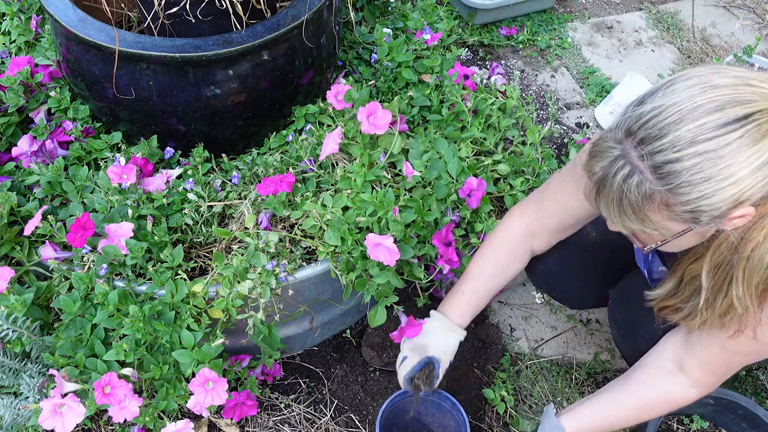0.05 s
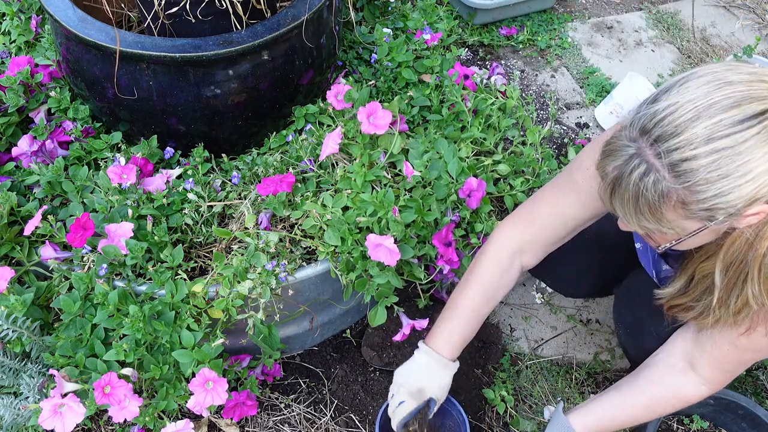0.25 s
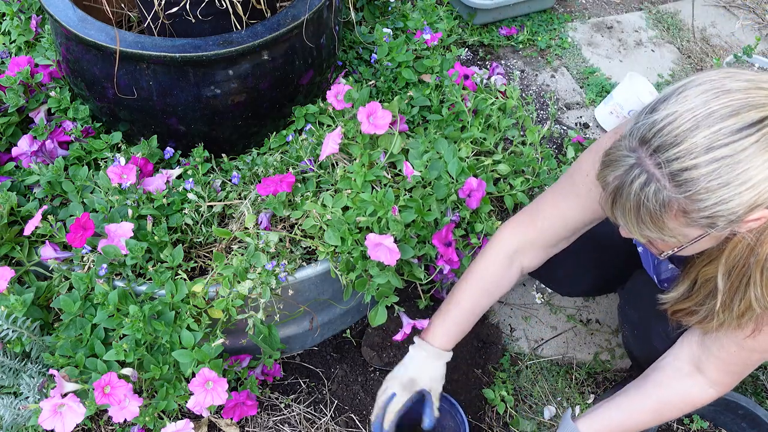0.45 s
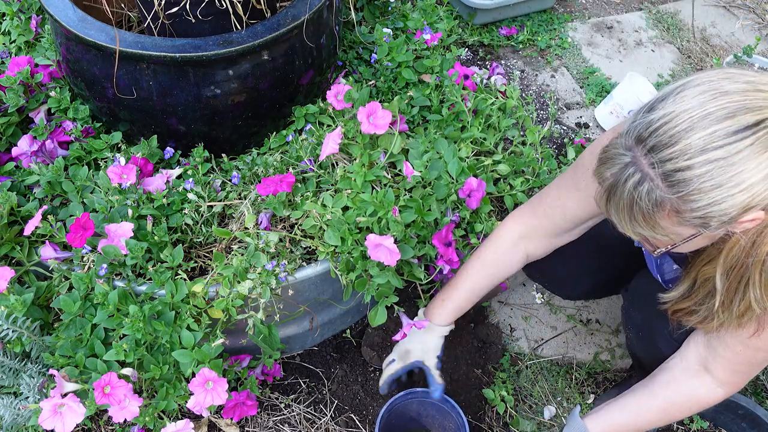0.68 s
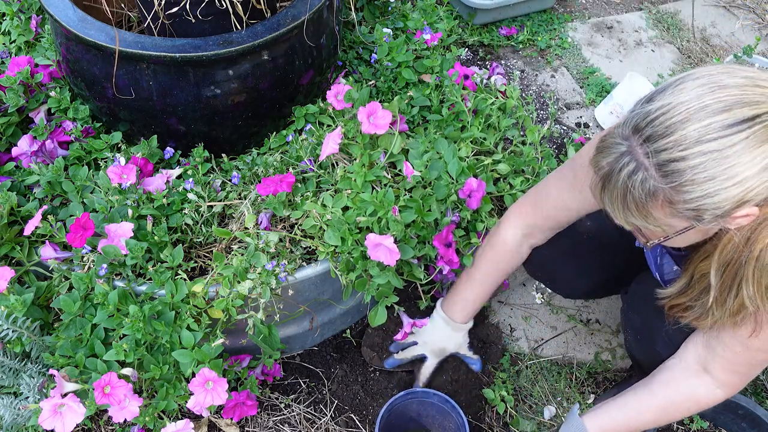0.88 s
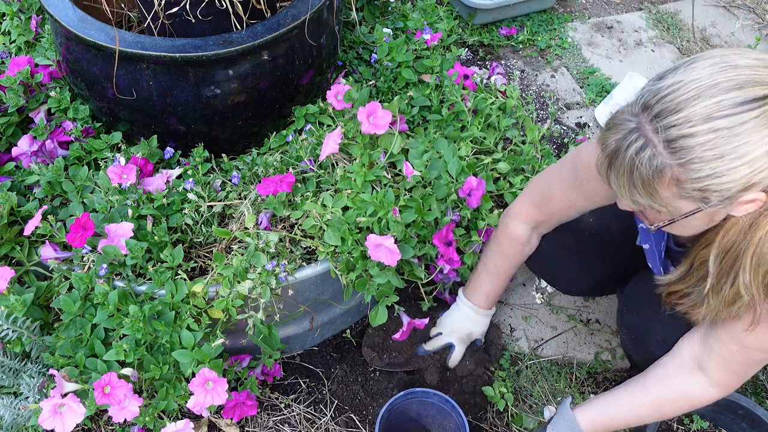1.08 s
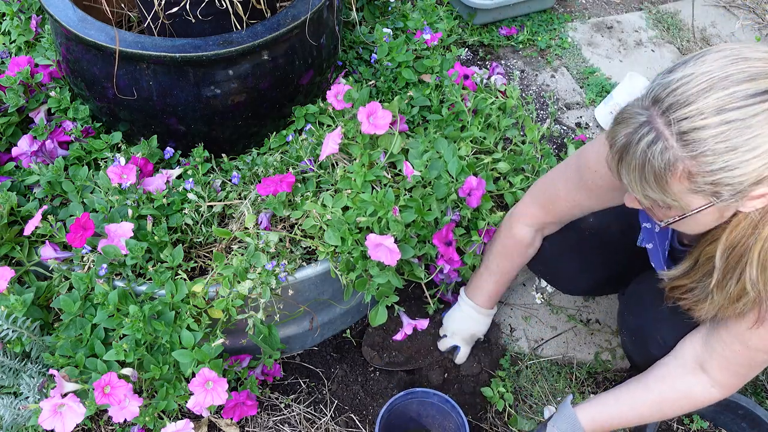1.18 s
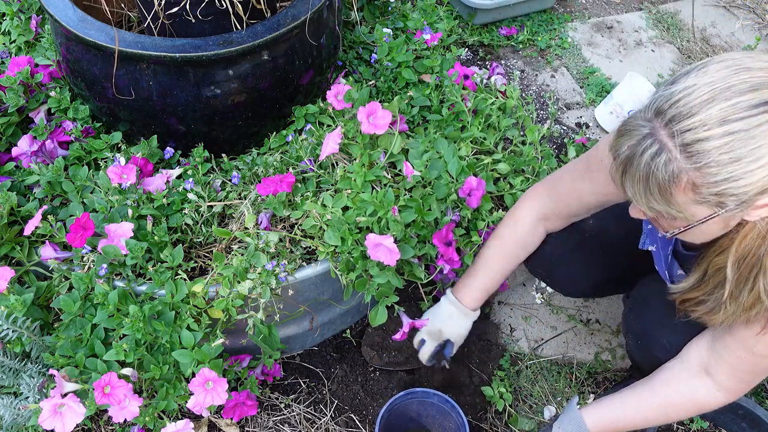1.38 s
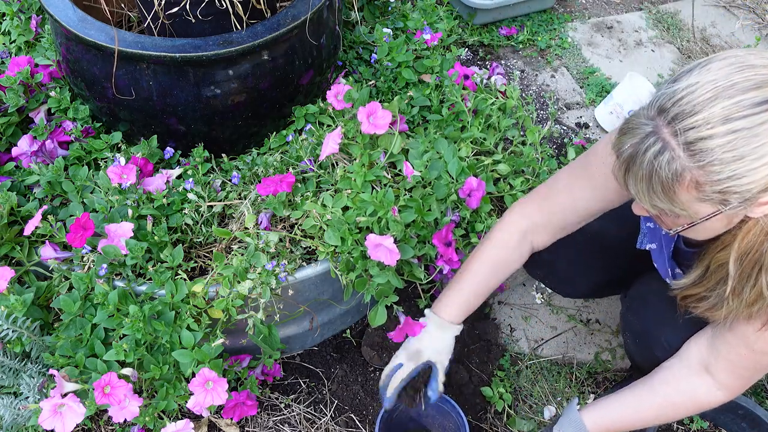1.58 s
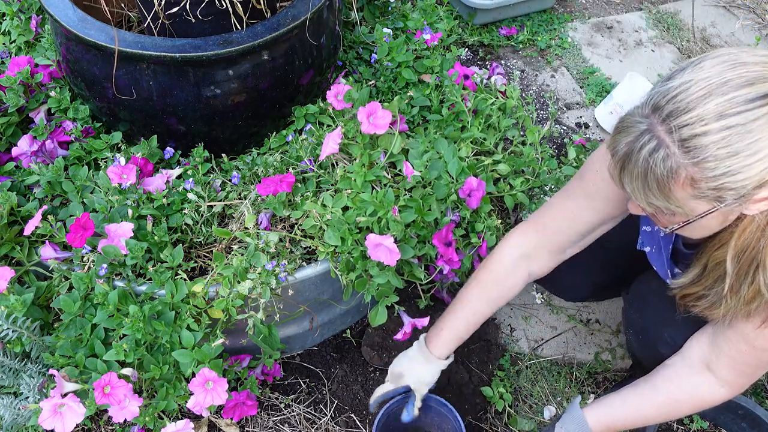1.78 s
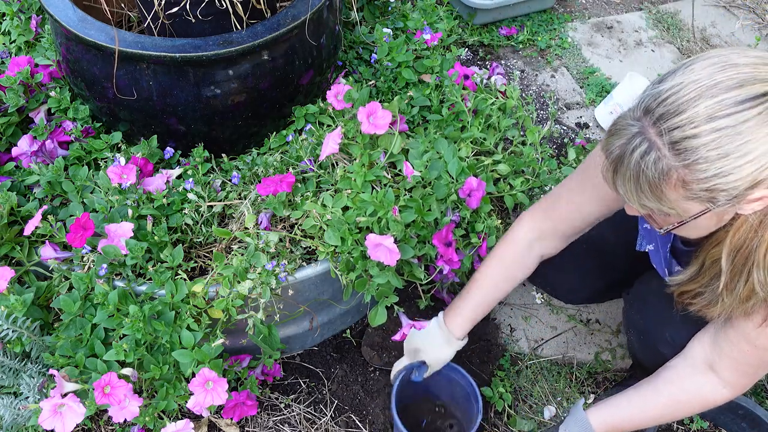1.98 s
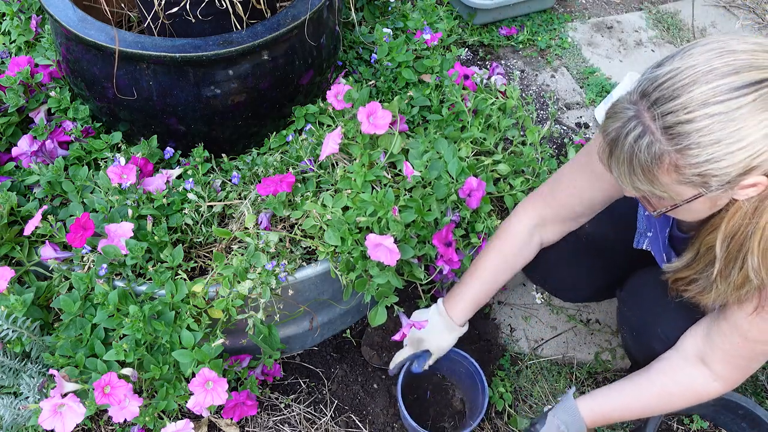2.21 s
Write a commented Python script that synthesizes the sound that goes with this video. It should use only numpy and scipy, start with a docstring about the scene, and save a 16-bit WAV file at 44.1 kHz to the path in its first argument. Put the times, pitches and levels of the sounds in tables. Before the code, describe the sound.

Loose soil dropping into a small plastic pot, with a gloved hand sweeping the ground.

```python
"""In a quiet garden, a gloved hand drops a handful of loose soil into a small plastic pot.
Clods tap the thin wall and ring it, crumbs patter after them and the soft bulk lands on the soil inside.
Then the hand pats and presses the ground and sweeps soil together, grit ticking on the glove.
From about 1.6 s a second, lighter handful falls, and a few soft lumps skid along the wall."""
import sys
import numpy as np
from scipy import signal
from scipy.fft import rfft, irfft, next_fast_len
from scipy.io import wavfile
from scipy.ndimage import uniform_filter1d

SR = 44100
rng = np.random.default_rng(int(sys.argv[2]) if len(sys.argv) > 2 else 0)


def wav_record(signal):
    """Record a signal, one row per channel, as 16-bit PCM in the file named by sys.argv[1]."""
    frames = np.transpose(np.atleast_2d(signal))
    bounded = np.clip(frames, -1, 1)
    # unit amplitude maps onto the largest positive 16-bit level
    quanta = np.round(bounded * 32767).astype(np.int16)
    wavfile.write(sys.argv[1], SR, quanta)


N = 99225
TIME = np.arange(N) / SR


def from_db(db):
    """Decibels to gain."""
    return 10 ** (np.asarray(db) / 20)


def unit_rms(x):
    """Scale to unit rms."""
    return x / np.sqrt(np.mean(x ** 2) + 1e-20)


def automation(rows):
    """Straight ramps between breakpoints, holding the first and last value."""
    return np.interp(TIME, *np.transpose(rows))


def place(track, start, sound):
    """Mix a sound in at a time in seconds."""
    i = int(start * SR)
    track[i:i + len(sound)] += sound[:N - i]


def butter(x, order, hz, kind="low"):
    """Butterworth filter."""
    return signal.sosfilt(signal.butter(order, hz, kind, fs=SR, output="sos"), x)


def equalise(x, curve):
    """Minimum-phase EQ, so nothing rings ahead of a click; unit rms."""
    size = 2 * next_fast_len(N)
    hz, db = np.transpose(curve)
    bin_db = np.interp(np.log(np.fft.rfftfreq(size, 1 / SR) + 1), np.log(hz), db)
    cepstrum = irfft(np.log(from_db(bin_db)))
    cepstrum[1:size // 2] *= 2
    cepstrum[size // 2 + 1:] = 0
    return unit_rms(irfft(rfft(x, size) * np.exp(rfft(cepstrum)))[:N])


def ring(x, hz, t60):
    """A resonance that keeps the energy of a click."""
    radius, angle = from_db(-60 / (t60 * SR)), 2 * np.pi * hz / SR
    gain = np.sqrt((1 - radius ** 2) / 2)
    return signal.lfilter([gain, 0, -gain], [1, -2 * radius * np.cos(angle), radius ** 2], x + 1e-18)


def blip(hz, rise_s):
    """A few cycles that swell and die at once."""
    t = TIME[:SR // 16]
    return t / rise_s * np.exp(1 - t / rise_s) * np.sin(2 * np.pi * hz * t)


def crunch(decay_s):
    """The noise burst of a grain breaking up."""
    t = TIME[:SR // 32]
    return rng.standard_normal(len(t)) * np.exp(-t / decay_s)


def grains(per_s, spread_db):
    """Random clicks of uneven size, with even mean power at any rate."""
    hits = rng.random(N) < per_s / SR
    sizes = from_db(spread_db * np.minimum(rng.exponential(1, N), 3)) * rng.choice([-1, 1], N)
    return unit_rms(hits * sizes / np.sqrt(per_s))


def steady(x, over_s):
    """Even out the power over a short span, leaving the fine grain."""
    power = np.abs(uniform_filter1d(x * x, int(over_s * SR) + 1))
    return x / np.sqrt(power + .02 * np.mean(x * x))


# EQ of the garden ambience: f/Hz, level/dB
AIR_EQ = [(20, -13), (45, -1.5), (110, 1), (550, -6.5), (1000, -9), (2500, -25), (8000, -24.5),
          (16000, -43)]

def garden_air():
    """A faint, dark bed of outdoor noise."""
    return from_db(-54.5) * equalise(rng.standard_normal(N), AIR_EQ)


LIGHT_TOUCH_HZ, GRIT_DECAY_S = [5670, 10800], 0.00094

def specks():
    """Specks shift on the glove throughout, each a tiny bright tick."""
    clicks = steady(grains(per_s=110, spread_db=3.5), over_s=0.1)
    power = signal.fftconvolve(clicks ** 2, np.exp(-TIME[:SR // 100] / GRIT_DECAY_S))[:N]
    ticks = np.sqrt(np.abs(power)) * rng.standard_normal(N)
    return from_db(-60) * unit_rms(butter(ticks, 2, LIGHT_TOUCH_HZ, "band"))


# resonances of the plastic pot: f/Hz, level/dB, t60/s
POT_MODES = [(420, -14.5, 0.013), (682, -5.5, 0.019), (1350, -5, 0.005), (1620, -1.5, 0.015),
             (1900, -7.5, 0.029), (2480, 2.5, 0.004), (2624, 2, 0.022), (2990, 1, 0.01), (3470, 0, 0.0041),
             (4310, -4, 0.006)]
# weight of the landing soil, as drive to the low resonances: t/s, level/dB
LANDING_WEIGHT = [(.1, -1.5), (.55, 1), (1.79, -5.5), (1.9, 0)]

def pot(clicks, uneven, low_modes_hz=2200):
    """Each click rings every resonance with a strength of its own; heavy landings favour the low ones."""
    gains = from_db([db for _, db, _ in POT_MODES])
    gains /= np.linalg.norm(gains)
    weight = from_db(automation(LANDING_WEIGHT))
    out = np.zeros(N)
    for k, (hz, _, t60) in enumerate(POT_MODES):
        drive = clicks * weight if hz < low_modes_hz else clicks
        strength = 1 + uneven * rng.standard_normal(N)
        out += (-1) ** k * gains[k] * ring(drive * strength, hz, t60)
    return out


def cavity(x, notch_hz=876, depth=0.75):
    """The hollow of the pot cuts a notch into all that sounds inside it."""
    return x - depth * signal.lfilter(*signal.iirpeak(notch_hz, Q=4.2, fs=SR), x)


# envelope of the crumbs pouring in: t/s, level/dB
POUR_LEVEL = [(0, -66), (.03, -51), (.228, -46.5), (.245, -37.5), (.29, -33.5), (.31, -22.5), (.35, -30.5),
              (.375, -22.5), (.397, -32.5), (.412, -26), (.445, -36), (.49, -26), (.55, -33), (.585, -41),
              (.64, -45), (.70, -66), (1.53, -67), (1.58, -50), (1.66, -55.5), (1.73, -61.5),
              (1.768, -46.5), (1.783, -37), (1.835, -31.5), (1.87, -40), (1.98, -51.5), (2.05, -48),
              (2.105, -51), (2.175, -40), (2.21, -55)]
# EQ of the fine dust: f/Hz, level/dB
DUST_EQ = [(1000, -4.5), (5000, 3), (7000, -2), (10000, -6), (13000, -2), (16000, -11.5)]

def crumbs(dust_decay_s=0.0015):
    """Crumbs patter on the pot, denser as the pour thickens; each sheds a puff of fine dust."""
    db = automation(POUR_LEVEL)
    per_s = 1200 * from_db(.3 * (db - db.max()))
    clicks = steady(grains(per_s, spread_db=3.5), over_s=.03)
    puff_power = signal.lfilter([1], [1, -np.exp(-1 / (dust_decay_s * SR))], clicks ** 2 + 1e-18)
    dust = equalise(np.sqrt(puff_power) * rng.standard_normal(N), DUST_EQ)
    patter = unit_rms(pot(clicks, uneven=0.7))
    return from_db(db) * (patter + from_db(-8.5) * dust)


# envelope of the soft body of each handful: t/s, level/dB
BULK_LEVEL = [(0, -57.5), (.28, -61), (.308, -33), (.37, -37.5), (.44, -56), (.51, -31), (.56, -37.5),
              (.60, -48.5), (.68, -80.5), (1.81, -76), (1.97, -53), (2.18, -49), (2.25, -59.5)]
# its muffled EQ: f/Hz, level/dB
BULK_EQ = [(100, -30), (220, -13), (430, 3.5), (700, 3.5), (950, -4), (1450, -2.5), (2200, -2.5),
           (5000, -24)]

def bulk():
    """The mass of the handful lands softly on the soil in the pot."""
    return from_db(automation(BULK_LEVEL)) * equalise(grains(per_s=900, spread_db=5.5), BULK_EQ)


# clod hits, each at the pitch of the spot struck: t/s, level/dB, f/Hz
CLOD_HITS = [(0.0266, -26, 2920), (0.0745, -26.5, 2700), (0.1338, -21.5, 2870), (0.1681, -28, 2970),
             (0.2031, -15.5, 2950), (0.2362, -7, 2970), (0.2672, -10.5, 3000), (0.307, -10, 2700),
             (.3132, -13.5, 2780), (.329, -12, 2700), (0.3684, -12, 2720), (0.3742, -14.5, 2700),
             (0.3864, -18, 2300), (0.4406, -16.5, 3130), (0.5053, -8, 1550), (0.5083, -14.5, 2530),
             (0.5198, -13, 2860), (0.527, -15, 2700), (0.541, -11, 2630), (0.5422, -10.5, 1580),
             (0.6208, -18.5, 2440), (1.579, -31, 3120), (1.612, -34.5, 3140), (1.677, -27.5, 3070),
             (1.689, -31, 2900), (1.739, -34, 2900), (1.7721, -22.5, 3330), (1.8247, -17, 2770),
             (1.8414, -13.5, 2980), (1.8889, -23, 2740), (1.961, -38, 1920), (2.027, -27, 3060),
             (2.0384, -26, 3400), (2.045, -29, 3400), (2.0555, -23, 2950), (2.176, -27, 2620),
             (2.1914, -28, 3300)]

def clods(rise_s=.00036):
    """A clod flexes the wall where it lands, cracks apart and rings the whole pot."""
    taps, clicks, cracks = np.zeros((3, N))
    for start, db, hz in CLOD_HITS:
        place(taps, start, from_db(db) * blip(hz, rise_s))
        place(clicks, start + rise_s, from_db([db]))
        place(cracks, start, from_db(db - 15) * crunch(decay_s=0.0025))
    cracks = butter(cracks, 1, [500, 6350], "band")
    ringing = from_db(7) * pot(clicks, uneven=0.29)
    return taps + from_db(.5 * automation(LANDING_WEIGHT)) * (cracks + ringing)


# sharp ticks of grit: t/s, level/dB, f/Hz
GRIT_TICKS = [(0.0883, -28, 8650), (.0988, -24.5, 12900), (.115, -25.5, 5500), (.2513, -18.5, 13100),
              (.3761, -16.5, 5400), (.5079, -12, 10500), (.79, -32, 7640), (0.9038, -28.5, 6500),
              (0.9198, -27.5, 8900), (1.331, -31.5, 4420), (1.6763, -23.5, 6640), (1.762, -26, 9200)]

def grit(broadband_share=0.36):
    """Hard grains break with a short, bright crack."""
    out = np.zeros(N)
    for start, db, hz in GRIT_TICKS:
        crack = crunch(GRIT_DECAY_S)
        tick = signal.lfilter(*signal.iirpeak(hz, Q=5, fs=SR), crack) + broadband_share * crack
        place(out, start, from_db(db) * tick / np.abs(tick).max())
    return butter(out, 2, [2500, 14500], "band")


# dull pats of the hand and of packed soil, and at 1.75 s a dull knock on the pot: t/s, level/dB, f/Hz
PAT_HITS = [(0.1929, -36, 560), (.302, -33, 256), (0.555, -27, 507), (0.588, -39.5, 171),
            (0.7493, -40, 450), (0.9629, -31, 550), (0.9634, -38, 1220), (0.9648, -33, 253),
            (0.964, -38.5, 113), (1.7492, -28.5, 664)]

def pats(rise_cycles=0.59):
    """Packed soil takes a blow with a dead thud, and once the pot takes a dull knock."""
    out = np.zeros(N)
    for start, db, hz in PAT_HITS:
        place(out, start, from_db(db) * blip(hz, rise_cycles / hz))
    return out


# envelope of the glove rubbing over the ground: t/s, level/dB
SWEEP_LEVEL = [(.66, -58), (.79, -58.5), (.91, -62), (.97, -54), (1.025, -39), (1.085, -41), (1.16, -43),
               (1.21, -49), (1.255, -46.5), (1.28, -64), (1.43, -56), (1.53, -67)]
# EQ of the rub at full pressure: f/Hz, level/dB
SWEEP_EQ = [(200, -13.5), (550, 6), (1100, -5), (1750, 8), (3600, -3), (6800, 4), (8000, 0), (9200, 1.5),
            (12500, -1.5), (16000, -8)]

def sweep(catch_hz=60, catch_db=1.5):
    """The glove catches and slips on soil: thin ticking when light, a full hiss when it bears down."""
    db = automation(SWEEP_LEVEL)
    pressure_db = db - db.max()
    wobble = uniform_filter1d(rng.standard_normal(N), size=200)
    catch = from_db(catch_db * unit_rms(butter(wobble, 1, catch_hz)))
    contacts = steady(grains(per_s=8000 * from_db(0.85 * pressure_db), spread_db=2), over_s=.04)
    rub = equalise(catch * contacts, SWEEP_EQ)
    thin = butter(rub, 1, LIGHT_TOUCH_HZ, "band")
    fullness = from_db(0.095 * pressure_db)
    return from_db(db) * (thin + fullness * (rub - thin))


# pushes of the hand into the ground: t/s, length/s, level/dB
PRESS_SWELLS = [(0.816, 0.2, -51), (1.15, 0.22, -52)]
# their bass-heavy EQ: f/Hz, level/dB
PRESS_EQ = [(40, -12), (130, -4.5), (380, -6.5), (3000, -32)]

def presses():
    """Soil gives under the hand with a low rumble that swells and fades."""
    force = np.zeros(N)
    for start, length, db in PRESS_SWELLS:
        place(force, start, from_db(db) * np.sqrt(np.hanning(int(length * SR))))
    return force * equalise(rng.standard_normal(N), PRESS_EQ)


# zips of the glove's knit: t/s, length/s, level/dB, f/Hz
KNIT_RASPS = [(1.04, .055, -44.5, 9250), (1.068, 0.038, -42.5, 6600)]

def rasps():
    """The knit slips over grit at an uneven rate: a thin zip within the sweep."""
    out = np.zeros(N)
    for start, length, db, hz in KNIT_RASPS:
        swell = np.sqrt(np.hanning(int(length * SR)))
        rasp = unit_rms(ring(rng.standard_normal(len(swell)), hz, t60=0.0034))
        place(out, start, from_db(db) * swell * rasp)
    return out


# soft lumps skidding, at the pitch of the wall: t/s, length/s, level/dB, f/Hz
LUMP_SKIDS = [(1.744, .013, -38.5, 1840), (1.774, 0.0061, -35, 2710), (1.783, 0.012, -29, 2807)]

def skids(release_s=.003):
    """A crumbling lump rubs the wall in a dense, bright rush and keeps one spot of it ringing."""
    out = np.zeros(N)
    hiss = from_db(-7) * equalise(rng.standard_normal(N), DUST_EQ)
    for start, length, db, hz in LUMP_SKIDS:
        contact = (TIME > start) * np.exp(-np.maximum(TIME - start - length, 0) / release_s)
        wall = steady(ring(rng.standard_normal(N), hz, t60=0.012), over_s=length)
        out += from_db(db) * contact * (wall + hiss)
    return out


def reflections(x, t60=0.043, predelay_s=.002):
    """Paving and planters scatter back a short, faint tail."""
    t = TIME[:SR // 4]
    tail = rng.standard_normal(len(t)) * from_db(-60 * t / t60) * (t > predelay_s)
    tail = butter(tail / np.linalg.norm(tail), 1, 5000)
    return from_db(-15) * signal.fftconvolve(x, tail)[:N]


def scene():
    """Soil in the pot and the hand's work, with their reflections, over the garden air; mono."""
    in_pot = cavity(clods() + skids() + crumbs() + bulk())
    close = in_pot + grit() + specks() + pats() + presses() + sweep() + rasps()
    return (close + reflections(close) + garden_air())[None]


def record(dry, cutoff_hz=15900):
    """A steep high cut on the whole mix."""
    return signal.sosfilt(signal.ellip(12, .2, 80, cutoff_hz, fs=SR, output="sos"), dry)


dry = scene()
out = record(dry)
wav_record(out)
```